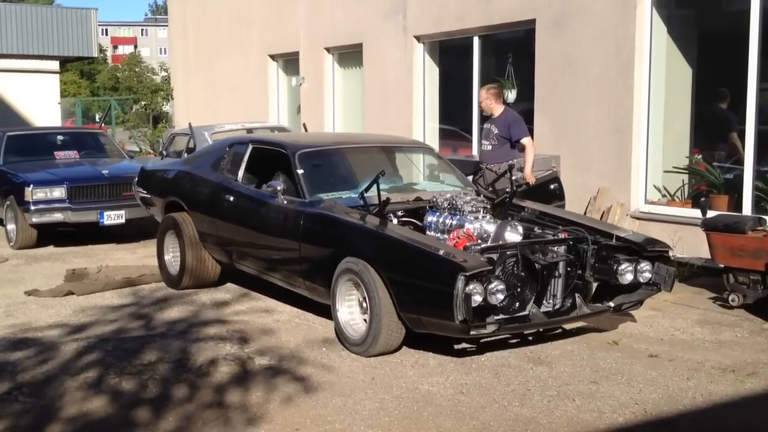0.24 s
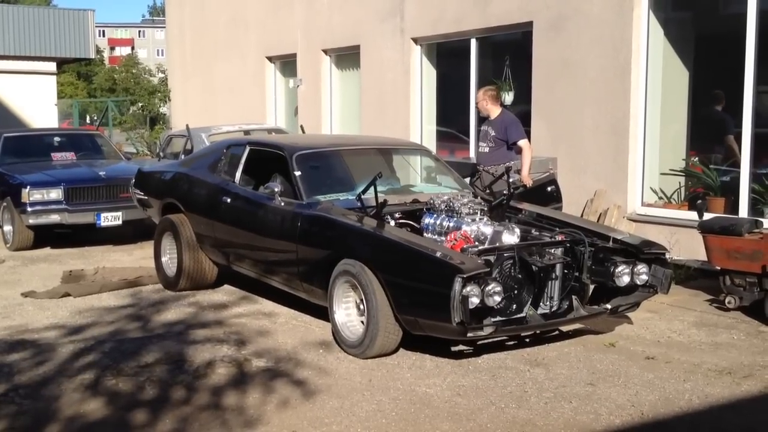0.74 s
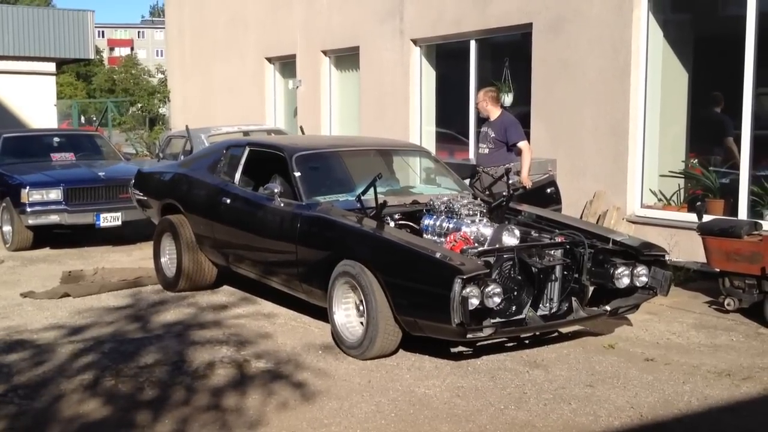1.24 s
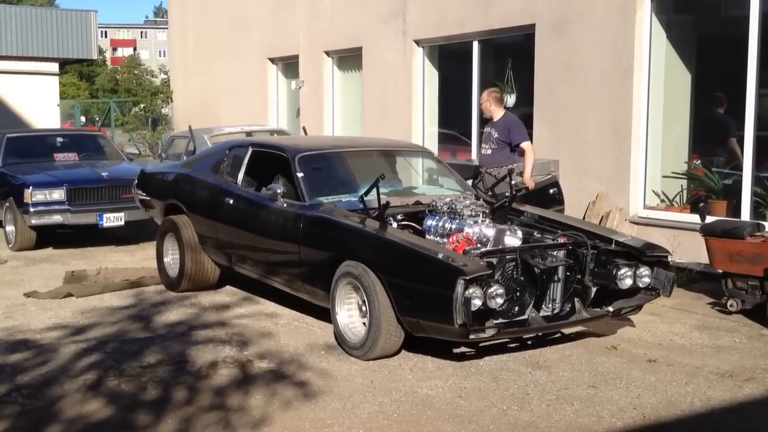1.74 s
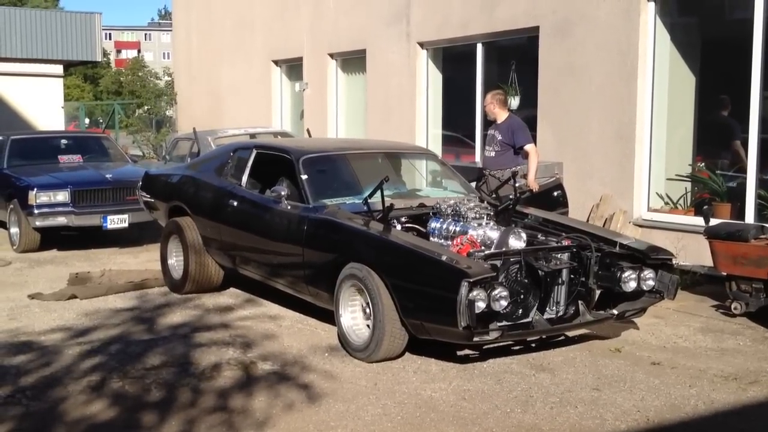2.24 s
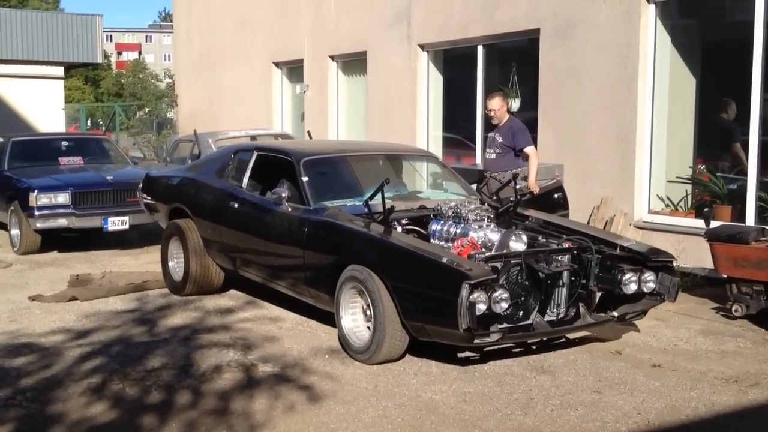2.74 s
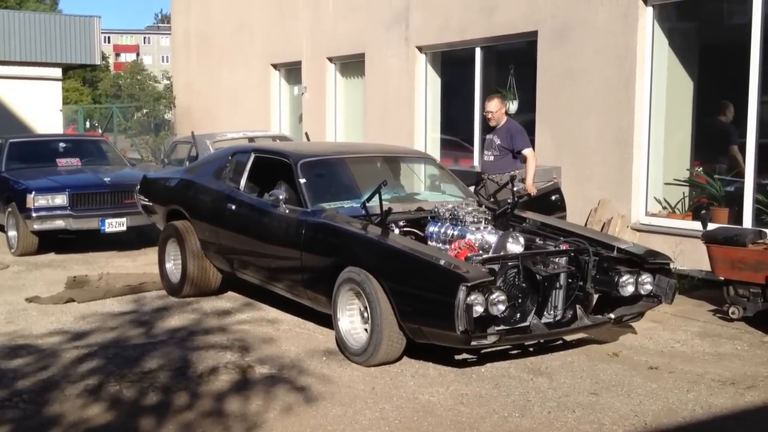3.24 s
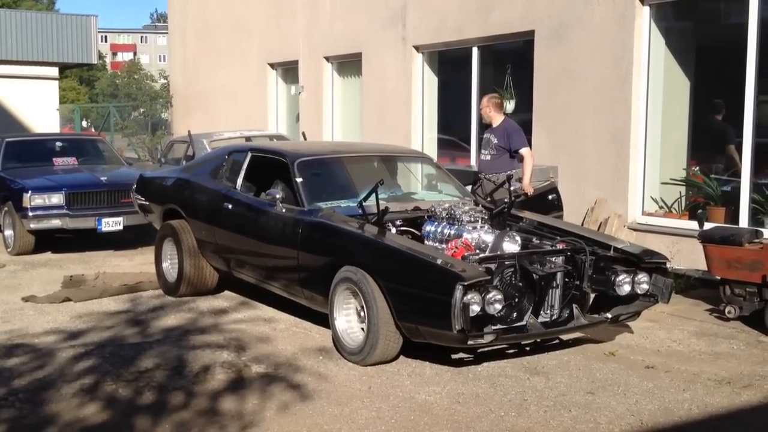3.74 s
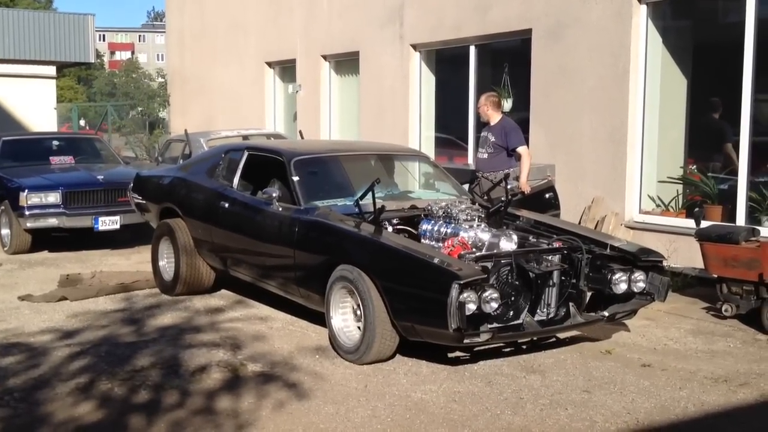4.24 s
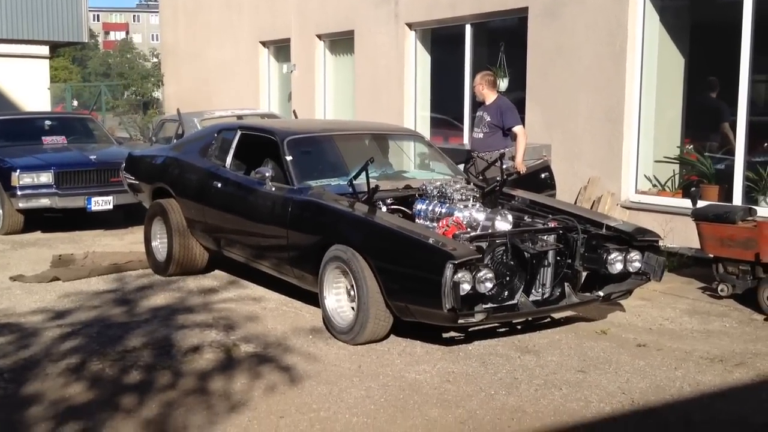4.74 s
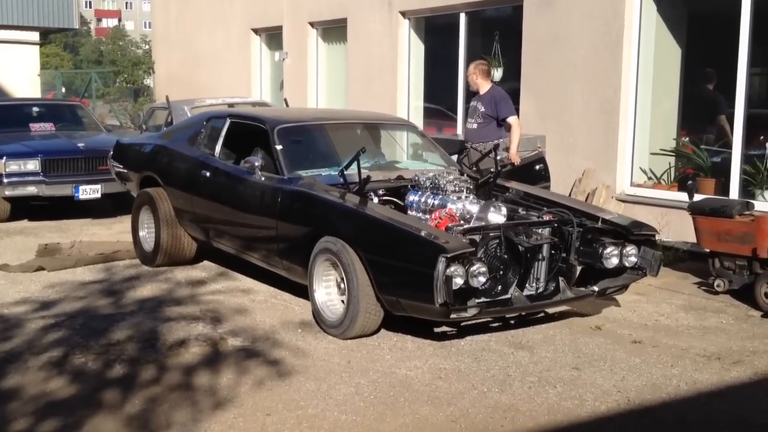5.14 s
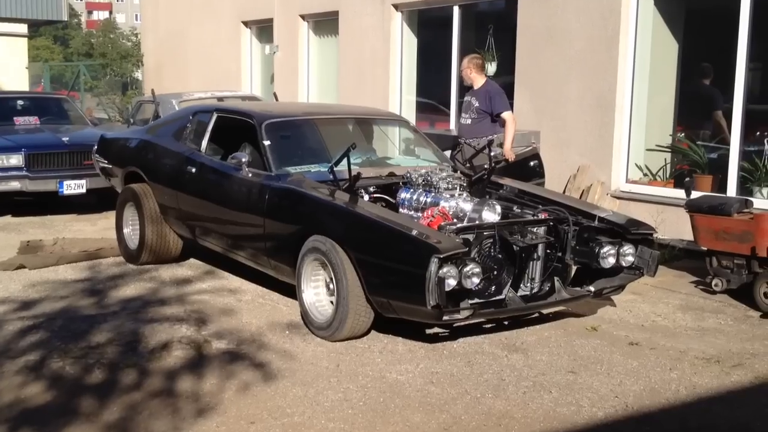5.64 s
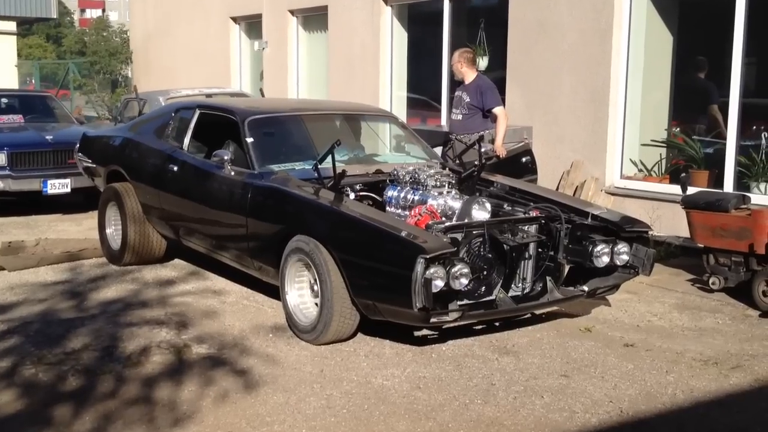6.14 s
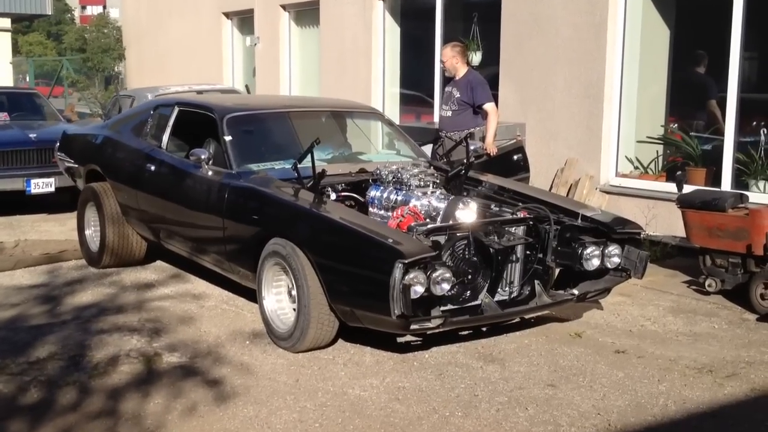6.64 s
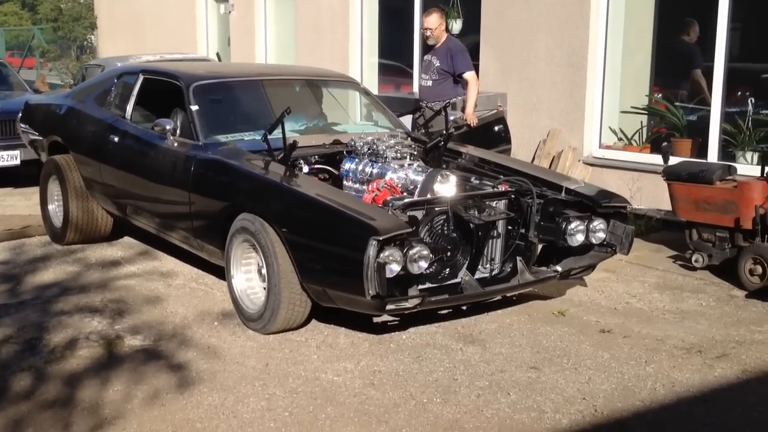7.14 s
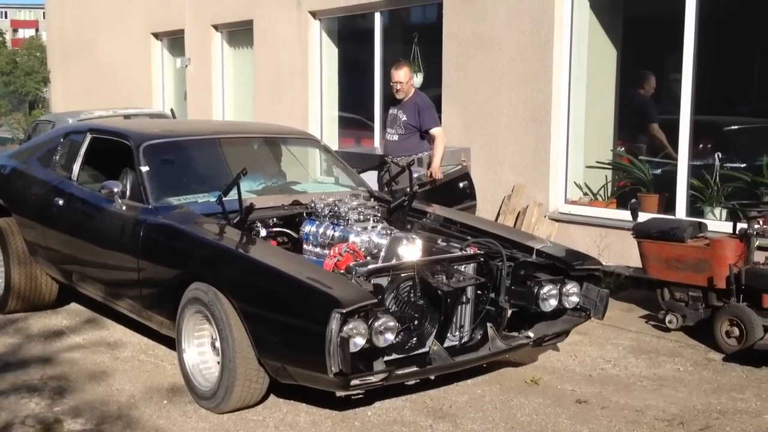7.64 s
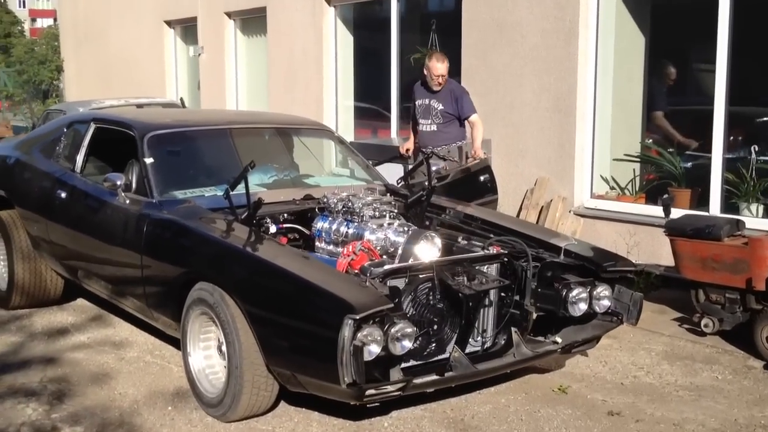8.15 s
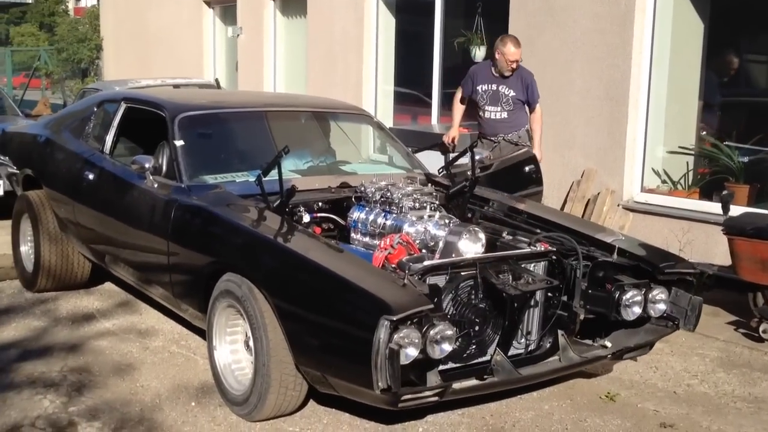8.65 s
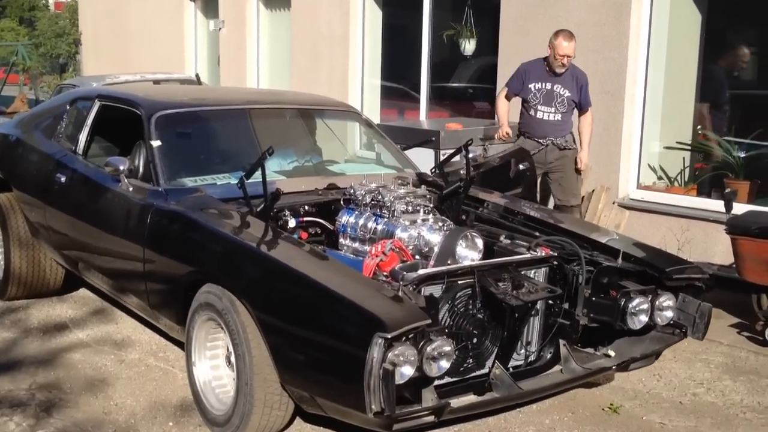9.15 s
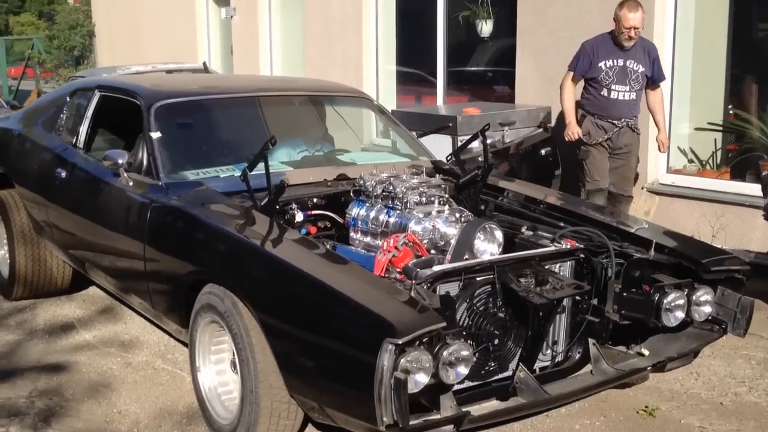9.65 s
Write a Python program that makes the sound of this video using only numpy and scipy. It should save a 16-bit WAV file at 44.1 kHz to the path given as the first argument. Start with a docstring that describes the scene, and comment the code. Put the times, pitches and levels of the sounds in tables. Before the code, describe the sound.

Sputtering at first, a large V8 car engine catches with repeated throttle blips, each with a booming exhaust, a hiss of sucked air and a brief belt chirp. It then holds a quick, throbbing idle, topped by a high supercharger whine and mechanical clatter, its speed creeping slightly upward. The microphone approaches the front of the car in an open yard that adds a light echo.

```python
"""A big supercharged V8, bonnet off, stumbles into life in a yard: revving bursts, then a fast, lumpy idle.
Uneven firings boom in two open exhausts, the valve gear clatters, the carburettors gulp, spit and
hiss, and the toothed blower belt whines with every twist of the crank. Ground and house front echo
the rasp and the whine. One microphone, carried closer and round to the nose of the car."""
import sys
import numpy as np
from scipy import signal
from scipy.fft import rfft, irfft, next_fast_len
from scipy.io import wavfile
from scipy.ndimage import uniform_filter1d, map_coordinates

SR = 44100
rng = np.random.default_rng(int(sys.argv[2]) if len(sys.argv) > 2 else 0)


def int16_out(signal):
    """Quantize to a 16-bit WAV file."""
    q = np.round(np.clip(np.atleast_2d(signal).T, -1, 1) * 32767)
    wavfile.write(sys.argv[1], SR, q.astype(np.int16))


N = 436149
TIME = np.arange(N) / SR
SIZE = next_fast_len(N + SR)
FREQ = np.maximum(np.arange(SIZE // 2 + 1) * SR / SIZE, 1)

# scatter of the firing strength, shrinking as combustion evens out: time_s, scatter_share
FIRING_SCATTER = [(0, .38), (4.4, .28), (5.2, .42), (6.6, .38), (7.4, .24), (8.5, .17), (9.8, .08)]


def undb(db):
    """Decibels to gain."""
    return 10 ** (np.asarray(db) / 20)


def curves(rows):
    """Each value column of a (time_s, values...) table at every sample."""
    time_s, *columns = np.transpose(rows)
    return [np.interp(TIME, time_s, column) for column in columns]


def unit(x):
    """Scale to rms 1."""
    return x / np.sqrt(np.mean(x ** 2))


def steady(x, span_s=0.21):
    """Scale to a running rms of 1, keeping faster throbs."""
    size = int(span_s * SR / 2)
    power = uniform_filter1d(uniform_filter1d(unit(x) ** 2, size), size)
    return unit(x) / np.sqrt(power + 1e-6)


def shape(x, response):
    """Filter by a frequency response."""
    return irfft(rfft(x, SIZE) * response, SIZE)[:N]


def colour(x, points):
    """Filter by a spectrum of (freq_hz, level_db) points."""
    hz, db = np.transpose(points)
    return shape(x, undb(np.interp(np.log(FREQ), np.log(hz), db, left=-60)))


def ring(x, hz, width_hz):
    """Two like resonances in series, with gain 1 at the centre."""
    peak = signal.iirpeak(hz, hz / width_hz, fs=SR)
    return signal.lfilter(*peak, signal.lfilter(*peak, x))


def tails(pulses, decay_s):
    """Give each pulse an exponential decay."""
    return signal.lfilter([1], [1, -np.exp(-1 / (decay_s * SR))], pulses)


def walk(rate_hz):
    """Smooth random drift of rms 1."""
    size = max(int(SR / rate_hz), 1)
    held = np.repeat(rng.standard_normal(N // size + 1), size)[:N]
    return unit(uniform_filter1d(held, size))


def each_cycle(cycle, count):
    """A random pattern of count points that comes round with every engine cycle."""
    return unit(map_coordinates(rng.standard_normal(count), [cycle % 1 * count], order=3, mode="grid-wrap"))


def settled(start_s=3.13, end_s=4.93):
    """How steadily the engine runs, 0-1."""
    return np.interp(TIME, [start_s, end_s], [0, 1])


def crank():
    """Each burst lifts speed (four-stroke cycles a second) and load; the belt chirps at its very top."""
    # speed to which the engine sinks between bursts: time_s, cycle_hz
    stumble = [(0, 8.25), (.75, 8.05), (1.0, 8.65), (1.6, 6.6), (2.2, 9.03), (3.0, 9.38), (3.7, 10.1),
               (4.2, 10), (4.5, 11.1), (4.76, 13.6)]
    # the idle creeping up: time_s, cycle_hz
    idle = [(4.95, 15.0), (5.15, 15.3), (5.45, 15.42), (5.8, 15.35), (6.05, 15.78), (6.3, 15.66),
            (6.65, 16.0), (6.9, 16.02), (7.15, 16.3), (8.2, 16.8), (8.5, 16.68), (8.83, 17.08),
            (9.1, 17.23), (9.89, 17.33)]
    # bursts of revs: top_s, top_hz, rise_s, fall_s, load_db, whine_db, octave_db
    bursts = [(0.5, 10.93, .12, .12, 7, -7, -12), (1.04, 10.44, 0.088, .08, 8.5, 1, -6),
              (1.21, 14.16, .075, .115, 10.5, -7, -2), (2.02, 13.43, .19, .15, 5.5, 1.5, 3.5),
              (2.66, 16.7, 0.13, .15, 8, 0.5, 5), (3.36, 18.6, .14, .16, 2, 0.5, 4.5),
              (4.34, 19.0, .295, .245, 3, -1, 6.5)]
    running_hz, = curves(list(stumble) + list(idle))
    cycle_hz, load_db, chirp_dbs, revving = running_hz, 0, 0, 0
    for top_s, top_hz, rise_s, fall_s, db, *tone_dbs in bursts:
        swell = np.exp(-((TIME - top_s) / np.where(TIME < top_s, rise_s, fall_s)) ** 2)
        cycle_hz = cycle_hz + (top_hz - running_hz) * swell
        load_db = load_db + db * swell
        chirp_dbs = chirp_dbs + np.outer(tone_dbs, swell ** 4)
        revving = revving + swell
    return cycle_hz, load_db, chirp_dbs, revving


def firings(cycle):
    """Eight pulses a cycle, each as strong as its cylinder and its luck with the mixture."""
    # firing order, the far bank later and weaker: strength_db, delay_s
    cylinders = [(4, 0.0031), (1.5, 0.00302), (3, .003), (4.5, 0.0013), (-2, 0.0029), (6, 0.00057),
                 (2, 0.0035), (-2.5, .003)]
    count = len(cylinders)
    at = np.flatnonzero(np.diff(np.floor(cycle * count)))
    cylinder = np.round(cycle[at] * count).astype(int) % count
    db, delay_s = np.array(cylinders)[cylinder].T
    scatter = curves(FIRING_SCATTER)[0][at]
    timing, mixture = rng.standard_normal((len(at), 2)).T
    arrival = at + SR * (delay_s + .0012 * scatter * timing)
    strength = undb(db) * np.maximum(1 + scatter * mixture, .05)
    return np.bincount(np.clip(arrival, 0, N).astype(int), strength, N + 1)[:N]


def exhaust_swells(ramp_s=0.047):
    """The exhaust's loudness swells and sags briefly before the idle, in dB."""
    # brief swells (+) and sags (-) in the exhaust's loudness: start_s, end_s, level_db
    swells = [(0.136, 0.34, -3.5), (0.39, 0.68, 2), (0.71, 0.92, -1.5), (1.02, 1.252, 3.5),
              (1.548, 1.777, -5), (1.81, 2.2, 2.5), (2.417, 2.52, -1), (2.772, 3.043, -1),
              (3.25, 3.363, 0.5), (3.39, 3.45, 0), (3.48, 3.62, -4), (3.78, 3.983, -4.5),
              (4.09, 4.342, -1.5), (4.366, 4.412, 1.5)]
    return sum(db * np.clip(np.minimum(TIME - start_s, end_s - TIME) / ramp_s + .5, 0, 1)
               for start_s, end_s, db in swells)


def exhaust(pulses, cycle_hz, cycle, revving, boom_db, dull_above_hz=187, cut_hz=90):
    """Firings ring the pipes; at idle, standing waves hold orders of the cycle that beat into a lump."""
    # pipe resonances: pitch_hz, width_hz, level_db
    pipes = [(109.7, 25, -9.5), (164.5, 24.4, -10), (195.6, 35, -0.5), (233, 23, -7), (292.4, 16.3, -12),
             (378.7, 8.9, -13.5), (584, 14, -32)]
    # standing waves in the pipes: cycle_order (rounded below), pitch_hz, width_hz, level_db
    standing_waves = [(6, 101.8, 2.9, -7.5), (7, 113.5, 4.7, -11), (8, 133.5, 14.5, -12),
                      (9, 148, 6.8, -18), (8, 123.2, 4.3, -3.5), (11, 190, 3, -6), (11, 181, 4.3, -6.5),
                      (11, 206.5, 3.3, 5), (12, 201.5, 2.8, -10.5), (12, 207, 8.1, -2), (13, 206, 6.4, -7),
                      (13, 216, 6.4, -6), (14, 230.7, 32, -9), (15, 246, 7.6, -10.5),
                      (17, 286, 16.4, -12.5), (18, 293, 6.1, -10.5), (19, 298, 7.5, -11.5),
                      (19, 311, 7.2, -13.5), (20, 378, 11, -16), (22, 380, 15, -14.5),
                      (23, 380, 9.5, -19.5), (29, 501, 8, -27), (35, 540, 7.6, -32), (36, 603, 4.3, -26),
                      (64.8, 1136, 39, -23), (67, 1157, 20, -30)]
    scatter, = curves(FIRING_SCATTER)
    turbulence = 2 * scatter * unit(tails(pulses, decay_s=.008)) * rng.standard_normal(N)
    push = unit(pulses) + turbulence
    # off throttle the firings are soft and barely reach the upper resonances
    dull_db_per_octave = -8 * np.maximum(1 - revving - settled(), 0)
    thuds, drone, drone_power = 0, 0, 0
    for hz, width_hz, db in pipes:
        dull_db = dull_db_per_octave * max(np.log2(hz / dull_above_hz), 0)
        thuds += undb(db + dull_db) * steady(ring(push, hz, width_hz), span_s=.2)
    # an order swells, and falls behind, while the speed carries it through its standing wave
    for order, hz, width_hz, db in standing_waves:
        detune = 2 * (round(order) * cycle_hz - hz) / width_hz
        wander = unit(undb(3.5 * scatter * walk(14)))  # uneven combustion unsettles it
        held = settled() * undb(db) / np.hypot(1, detune) * wander
        drone += np.sqrt(2) * held * np.sin(2 * np.pi * round(order) * cycle - np.arctan(detune))
        drone_power += held ** 2
    # what the standing waves do not take up stays in the separate thuds
    thud_share = np.maximum(1 - 0.91 * drone_power, 0.065)
    # a long-overlap cam makes the exhaust chug once and twice a cycle, never quite alike
    lope_db = -np.cos(2 * np.pi * cycle) - 1.06 * np.cos(2 * np.pi * 2 * cycle)
    chug = unit(undb(settled() * lope_db + walk(45)))
    boom = (drone + thuds * np.sqrt(thud_share)) * chug * undb(boom_db)
    return shape(boom, 1 / np.sqrt(1 + (cut_hz / FREQ) ** 16))  # open pipe ends radiate no deep bass


def yard(x, wet_db, t60_s):
    """Ground and house front throw back distinct echoes, the rest of the yard a short wash."""
    lag_s = TIME[:SR // 2]
    wash = rng.standard_normal(len(lag_s)) * np.exp(-np.log(1000) * lag_s / t60_s) * (lag_s > .004)
    ground = 0.026 * np.exp(-2j * np.pi * FREQ * 0.0023)
    house = 0.068 * np.exp(-2j * np.pi * FREQ * 0.013)
    return shape(x, 1 + ground + house + undb(wet_db) * rfft(wash / np.linalg.norm(wash), SIZE))


def rasp(pulses, cycle, level_db):
    """A puff of turbulent gas follows each firing, over valve gear that clatters alike in every cycle."""
    # colour of gas and valve gear: freq_hz, level_db
    spectrum = [(150, 8), (420, -6.5), (500, -6.5), (640, -2.5), (850, -11), (1100, -9), (1450, -13),
                (2100, -4), (2700, -38), (3400, -10), (5000, -43), (9000, -60)]
    gas = unit(tails(pulses, decay_s=0.0061)) * rng.standard_normal(N)
    clatter = each_cycle(cycle, count=2400) * undb(-3)
    return steady(yard(colour(gas + clatter, spectrum), wet_db=2, t60_s=0.89)) * undb(level_db)


def suction(attack_share=0.3, release_s=0.026):
    """Strength of the gulps of air: each opens quickly, holds and dies away."""
    # gulps through the carburettors: start_s, length_s, hiss_db
    gulps = [(-0.02, 0.06, -48.5), (0.285, 0.14, -44), (0.374, 0.17, -40.5), (0.667, 0.096, -48),
             (0.836, 0.11, -43.5), (0.92, 0.28, -39), (1.507, 0.091, -49), (1.64, 0.17, -47.5),
             (1.732, 0.34, -39), (2.344, 0.11, -44.5), (2.445, 0.2, -37), (2.987, 0.14, -41.5),
             (3.112, 0.23, -38.5), (3.696, 0.38, -49), (3.99, 0.29, -45)]
    power = 0
    for start_s, length_s, db in gulps:
        opening = np.clip((TIME - start_s) / (attack_share * length_s), 0, 1)
        closing = np.exp(-np.clip(TIME - start_s - length_s, 0, 1) / release_s)
        power += (undb(db) * opening * closing) ** 2
    return np.sqrt(power)


def spitting(attack_s=.012, decay_s=0.047):
    """Strength of the spits back through the carburettors: each starts sharply and dies quickly."""
    # single spits between bursts: start_s, hiss_db
    spits = [(0.103, -38.5), (0.193, -44.5), (0.267, -39.5), (0.695, -44), (0.762, -41.5), (0.853, -41),
             (0.948, -36), (1.255, -48), (2.15, -44), (2.268, -47), (2.357, -40), (2.975, -43)]
    strength = 0
    for start_s, db in spits:
        age_s = np.maximum(TIME - start_s, 0)
        strength += undb(db) * np.minimum(age_s / attack_s, 1) * np.exp(-age_s / decay_s)
    return strength


def blower(cycle, rush_db, hiss_db, drops_per_s=70):
    """Rotors draw air in time with the crank, carburettors hiss; gulps swell both and sputter fuel."""
    # air through the rotors: freq_hz, level_db
    rush_spectrum = [(900, 0), (1700, 2.5), (2500, 9.5), (3100, 8.5), (4000, 9.5), (5200, 3.5), (6500, 2),
                     (8000, -1.5), (9500, -11), (11500, -20.5), (15000, -44)]
    # air through the carburettor throats: freq_hz, level_db
    hiss_spectrum = [(1500, -39), (4000, 8), (8000, 8), (10000, 1), (11500, -4), (13200, 1.5),
                     (14400, -3.5), (15500, -17)]
    throb_db = -0.5 * settled() * np.sin(2 * np.pi * 2 * cycle)
    flow = undb(throb_db - 0.57 * each_cycle(cycle, count=24) + 0.89 * walk(150))
    rotor_air = rng.standard_normal(N) + 0.39 * each_cycle(cycle, count=2000)
    rush = unit(colour(flow * rotor_air, rush_spectrum))
    hiss = unit(colour(flow * rng.standard_normal(N), hiss_spectrum))
    gulps = suction() * undb(0.8 * (1 - settled()) * walk(44.9))
    drops = (rng.random(N) < drops_per_s / SR) * rng.standard_normal(N)
    crackle = tails(drops, decay_s=.0015) * rng.standard_normal(N)
    sputter = unit(colour(crackle, hiss_spectrum)) * gulps * undb(-12)
    rush_gain = np.hypot(undb(rush_db), undb(3) * gulps)
    hiss_gain = np.hypot(undb(hiss_db), np.hypot(gulps, spitting()))
    return rush * rush_gain + hiss * hiss_gain + sputter


def belt(cycle_hz, cycle, revving, chirp_dbs, overrun_hz_per_s=39):
    """Teeth mesh with the pulley; crank twist and belt flap spread each tone into a cluster."""
    # belt tones, the main whine first: cycle_order, level_db, burst_change_db
    tones = [(118.85, 0, 0), (240, -2, 1.5), (357.2, -11.5, -1.5), (469, -19, -6), (66.63, -19, 7.5)]
    # the belt sings up with speed, all other tones following the octave: cycle_hz, whine_db, octave_db
    song = [(8, -73, -59), (10.4, -43.5, -44), (13.7, -40.5, -34), (15.2, -29.5, -32), (16.7, -26.7, -31),
            (17.25, -28, -30), (19, -25, -34.5)]
    song_hz, *song_dbs = np.transpose(song)
    whine_db, octave_db = chirp_dbs + [np.interp(cycle_hz, song_hz, dbs) for dbs in song_dbs]
    throb = np.sin(2 * np.pi * 2 * cycle)
    twist = .018 * np.sin(2 * np.pi * 4 * cycle) + .01 * throb
    flap = .028 * walk(230) * (1 + 0.31 * revving)
    flap -= uniform_filter1d(flap, size=1200)  # the teeth never skip
    mesh = np.cumsum(cycle_hz * (1 + twist + flap)) / SR
    # until the engine settles, the slack belt breaks up off load and fades while the revs fall
    slack_db = 3 * (1 - settled()) * np.maximum(1 - revving, 0) * walk(22.04)
    falling = np.clip(-np.gradient(cycle_hz) * SR / overrun_hz_per_s, 0, 1)
    slack_db -= 5 * (1 - settled()) * falling * np.maximum(1 - revving ** 2, 0)
    whine = 0
    for k, (order, db, burst_db) in enumerate(tones):
        tension = undb(1.2 * (each_cycle(cycle, count=16) + walk(140) + throb))
        scrape = .75 * walk(420) * (order > 200)  # teeth scraping in and out roughen the upper tones
        chatter = unit(undb(1.46 * walk(45) + 2.5 * settled() * throb))
        tone = tension * np.sin(2 * np.pi * order * mesh + scrape)
        tone = steady(yard(tone, wet_db=0, t60_s=0.25), span_s=.11)
        gain = undb(whine_db + 0.8 * walk(70)) if k == 0 else undb(octave_db) * chatter
        whine += tone * undb(db + burst_db * revving + slack_db) * gain
    return whine


def casing(x, nose_s=8.64):
    """The blower case favours some bands and cancels others; they switch as the nose is reached."""
    # peaks and hollows of the case: centre_hz, half_width_hz, side_db, nose_db
    bands = [(1960, 29, 0.5, 4), (2274, 51, -6, -0.5), (3910, 64, 1, 3.5), (4087, 98, -1.5, -5),
             (4260, 80, -1.5, 2), (4560, 90, -2, 6), (5330, 98, 0.5, 2), (5750, 140, -5, 2),
             (5850, 110, -1.5, -15), (6600, 89, 0, 3.5)]
    side_db, nose_db = 0, 0
    for hz, half_width_hz, from_side_db, from_nose_db in bands:
        bell = np.exp(-((FREQ - hz) / half_width_hz) ** 2)
        side_db += from_side_db * bell
        nose_db += from_nose_db * bell
    return np.where(TIME < nose_s, shape(x, undb(side_db)), shape(x, undb(nose_db)))


def outdoor_rumble(level_db=-63):
    """Faint low rumble of the open air, slowly wavering."""
    # background in the yard: freq_hz, level_db
    spectrum = [(20, -3), (60, 0), (120, -4), (500, -20), (4000, -40)]
    return unit(colour(rng.standard_normal(N), spectrum)) * undb(level_db + 2 * walk(3))


def scene(reference_hz=15, lump_s=9.198):
    """Crank speed and load drive exhaust, blower and belt; the microphone's walk sets their balance."""
    # the walk round to the nose: time_s, engine_bay_db, exhausts_db
    approach = [(4.8, 1.5, 3.5), (6.5, 3, 2.5), (7.4, 1.95, 0), (8.5, 4.5, 1.5), (9.2, 4, 2.8),
                (9.89, 2.5, 3)]
    bay_db, pipes_db = curves(approach)
    cycle_hz, load_db, chirp_dbs, revving = crank()
    cycle = np.cumsum(cycle_hz) / SR
    cycle -= np.interp(lump_s, TIME, cycle)  # here the exhaust bunches into its once-a-cycle lump
    doublings = np.log2(cycle_hz / reference_hz)
    boom_db = -24 + 12 * doublings + 0.13 * load_db
    rasp_db = -33 + 5.7 * doublings + 0.51 * load_db
    rush_db = -34.5 + 9.5 * doublings + 0.59 * load_db
    hiss_db = -48.5 + 14 * doublings + .1 * load_db
    boom_db = np.interp(TIME - 0.0046, TIME, boom_db)  # the tail pipes trail the throttle
    exhaust_db = pipes_db + exhaust_swells()
    pulses = firings(cycle)
    engine = exhaust(pulses, cycle_hz, cycle, revving, boom_db + exhaust_db)
    engine += rasp(pulses, cycle, rasp_db + (bay_db + exhaust_db) / 2)  # half bay, half pipes
    intake = casing(blower(cycle, rush_db, hiss_db) + belt(cycle_hz, cycle, revving, chirp_dbs))
    return (engine + intake * undb(bay_db) + outdoor_rumble())[None]


def record(dry):
    """The microphone rounds the highest peaks, and the top is cut at 15.2 kHz."""
    top_cut = signal.ellip(8, .2, 70, 15200, fs=SR, output="sos")
    return signal.sosfilt(top_cut, np.tanh(0.88 * dry) / 0.61)


dry = scene()
out = record(dry)
int16_out(out)
```